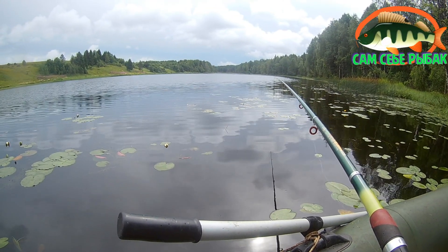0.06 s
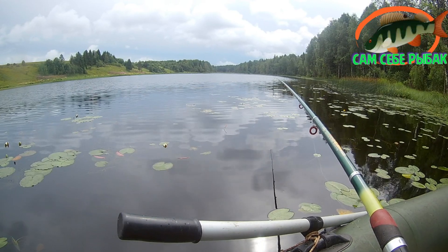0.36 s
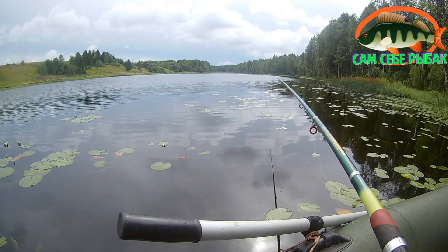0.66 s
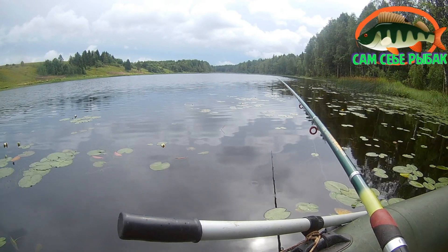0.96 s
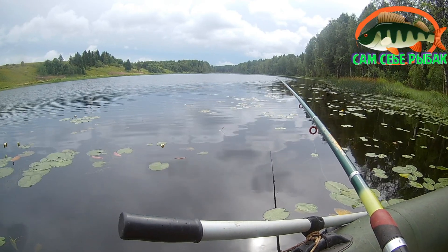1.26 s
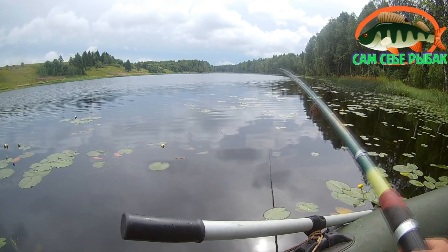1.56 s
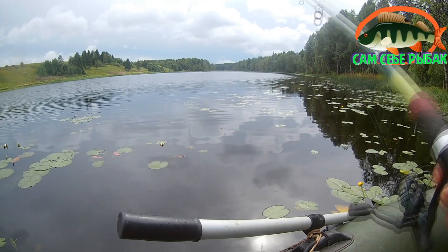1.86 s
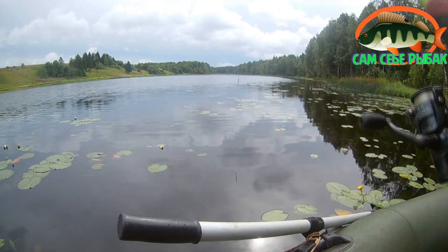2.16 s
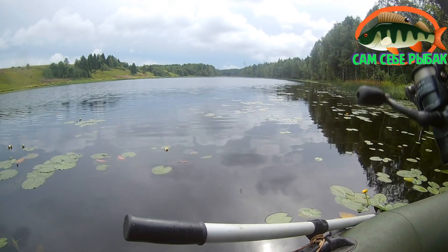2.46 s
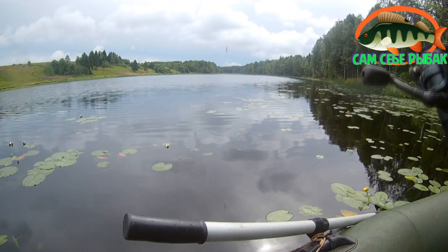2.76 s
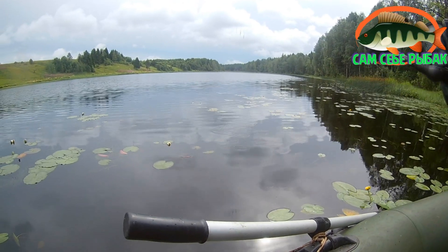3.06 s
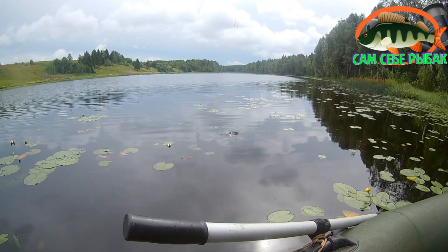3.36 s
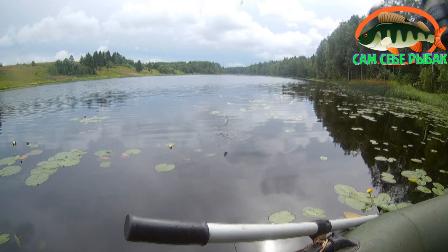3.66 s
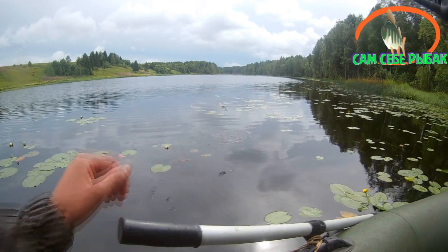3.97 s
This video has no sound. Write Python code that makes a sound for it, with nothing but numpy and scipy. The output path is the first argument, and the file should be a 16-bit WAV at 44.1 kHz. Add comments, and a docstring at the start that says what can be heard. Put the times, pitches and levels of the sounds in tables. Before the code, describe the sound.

A small plop in a river follows a rod's swish and reel clicks, in light wind.

```python
"""Light wind rumbles on the microphone; an insect chirps faintly and an inflatable boat's hull thumps.
A cast follows on the calm river: sleeve and rod rustle, the reel clicks, the rod whistles, line hisses.
The tackle plops in: a slap, ringing bubbles, a falling gurgle, one big cavity and a rising gulp.
A few drops fall back. Water and shore add a faint echo."""
import sys
import numpy as np
from scipy import signal
from scipy.fft import rfft, irfft, next_fast_len
from scipy.io import wavfile
from scipy.ndimage import map_coordinates

SR = 44100
rng = np.random.default_rng(int(sys.argv[2]) if len(sys.argv) > 2 else 0)


def to_wav(sig):
    """Store sig (one row per channel, or 1-D mono) as 16-bit WAV at the path in sys.argv[1].

    Samples outside -1..1 are clipped; the rate is SR.
    """
    pcm = np.clip(np.atleast_2d(sig), -1, 1) * 32767
    pcm = np.round(pcm).astype(np.int16)
    wavfile.write(sys.argv[1], SR, pcm.T)  # frames by channels


N = 4 * SR


def amp(db):
    """dB to gain."""
    return 10 ** (np.asarray(db) / 20)


def unit(x):
    """x at rms 1."""
    return x / np.sqrt(np.mean(x ** 2) + 1e-20)


def clock(n=N):
    """Times of n samples, s."""
    return np.arange(n) / SR


def curve(rows):
    """(time_s, value) rows, interpolated per sample."""
    return np.interp(clock(), *np.transpose(rows))


def wobble(rate_hz):
    """Smooth random curve, rate_hz knots per second."""
    return map_coordinates(rng.standard_normal(int(N * rate_hz / SR) + 4), [clock() * rate_hz])


def filtered(x, response):
    """Zero-phase filter with gain response(hz)."""
    size = next_fast_len(N + SR // 2)
    return irfft(rfft(x, size) * response(np.fft.rfftfreq(size, 1 / SR)), size)[:N]


def noise(spectrum):
    """Noise at rms 1, shaped by (freq_hz, gain_db) rows."""
    freq_hz, gain_db = np.transpose(spectrum)
    white = rng.standard_normal(N)
    return unit(filtered(white, lambda hz: amp(np.interp(np.log(hz + 1), np.log(freq_hz + 1), gain_db))))


def fade(t, t60_s):
    """Exponential decay, -60 dB at t60_s."""
    return np.exp(-np.log(1000) * t / t60_s)


def ramp(t, attack_s):
    """Linear rise to 1."""
    return np.minimum(t / attack_s, 1)


def damped(t, pitch_hz, t60_s):
    """Decaying sine."""
    return fade(t, t60_s) * np.sin(2 * np.pi * pitch_hz * t)


def sweep(pitch_hz):
    """Phase of a changing pitch, rad."""
    return 2 * np.pi * np.cumsum(pitch_hz) / SR


def add(track, start_s, sound):
    """Mix sound into track at start_s."""
    part = track[round(start_s * SR):][:len(sound)]
    part += sound[:len(part)]


def wind():
    """Wind on the microphone: low rumble, plus a brighter flutter in strong gusts."""
    levels = [(0, -44.5), (.04, -48.5), (.07, -39.5), (.12, -46), (.21, -50.5), (.26, -45), (.33, -47),
              (.39, -41.5), (.47, -47.5), (.535, -50), (.62, -53), (.76, -64), (1.36, -69), (1.52, -56.5),
              (1.9, -64.5), (2.15, -58.5), (2.36, -61), (2.53, -50.5), (2.78, -56), (2.96, -56),
              (3.06, -43.5), (3.17, -47), (3.26, -40), (3.33, -48.5), (3.56, -50.5), (3.66, -46.5),
              (3.76, -52), (3.89, -53.5), (4, -55.5)]  # time_s, level_db
    rumble_spectrum = [(10, -22.5), (22, 3.5), (55, 0), (80, 2), (120, -2.5), (190, -13), (300, -23.5),
                       (430, -36.5), (700, -59), (1500, -120)]  # freq_hz, gain_db
    gust_spectrum = [(20, -21), (70, -12.5), (130, 5), (210, -2.5), (320, -15.5), (500, -25), (1000, -45),
                     (2500, -51), (5000, -120)]  # freq_hz, gain_db
    flutter_db = 1.3
    level_db = curve(levels)
    gust_db = -51.5 + 2.02 * (level_db + 46.5)  # grows twice as fast as the rumble
    rumble = amp(level_db - 0.5 + flutter_db * wobble(21.88)) * noise(rumble_spectrum)
    gusts = amp(gust_db + flutter_db * wobble(28)) * noise(gust_spectrum)
    return rumble + gusts


def air():
    """Quiet open air with a faint high whine."""
    spectrum = [(60, -17.5), (150, -3), (270, -4.5), (450, -9.5), (900, -11.5), (1200, -16.5),
                (1600, -20.5), (2100, -21.5), (3000, -26), (5000, -30.5), (8000, -33.5), (11500, -35.5),
                (15500, -34)]  # freq_hz, gain_db
    tones = [(8903, -97), (9505, -99.5)]  # pitch_hz, level_db
    whine = sum(amp(db) * np.sin(2 * np.pi * hz * clock()) for hz, db in tones)
    return amp(-65.5 + 0.3 * wobble(5)) * noise(spectrum) + whine


def insect():
    """Short high rasps from the bank, five or six a second."""
    chirps = [(.065, -82), (.26, -80.5), (.51, -81.5), (.66, -80.5), (.825, -82), (.985, -81.5),
              (1.25, -84), (1.395, -80), (1.515, -82), (1.74, -85), (1.92, -82), (2.07, -82.5), (2.24, -83),
              (2.47, -83), (2.62, -83), (2.785, -81), (2.985, -80), (3.09, -82), (3.26, -80.5), (3.49, -78),
              (3.66, -80.5), (3.835, -80.5)]  # centre_s, level_db
    spectrum = [(5000, -39), (6600, -20), (7200, 0.5), (8000, -36), (8500, 1), (9000, 2.5), (9600, -3),
                (10400, -13), (13000, -28)]  # freq_hz, gain_db
    t, half_width_s = clock(), 0.023
    envelope = sum(amp(db) * np.exp(-((t - centre_s) / half_width_s) ** 4) for centre_s, db in chirps)
    return envelope * noise(spectrum)


def thumps():
    """The soft hull answers each bump with a few slow cycles."""
    bumps = [(0.521, -36, 80), (0.575, -45.5, 88), (0.799, -53, 69), (1.444, -50, 97), (2.411, -48, 64),
             (2.878, -44.5, 57.3), (3.802, -39.5, 51.6)]  # start_s, level_db, pitch_hz
    out, t = np.zeros(N), clock(SR // 6)
    swell_s = 0.0054
    envelope = t / swell_s * np.exp(1 - t / swell_s)
    for start_s, level_db, pitch_hz in bumps:
        add(out, start_s, amp(level_db) * envelope * np.sin(2 * np.pi * pitch_hz * t))
    return out


def rustle():
    """Grainy rubbing of sleeve and rod."""
    levels = [(0, -74.5), (1.45, -77.5), (1.55, -67.5), (1.63, -59), (1.68, -58.5), (1.76, -61),
              (1.86, -67), (2.0, -62), (2.13, -59.5), (2.22, -61), (2.3, -65), (2.55, -65.5), (2.9, -71.5),
              (3.08, -66.5), (3.3, -72.5), (3.65, -60.5), (3.8, -64), (4, -56.5)]  # time_s, level_db
    spectrum = [(100, -8), (230, 0), (560, 0), (740, 4), (930, 5), (1220, -1.5), (1480, -9.5), (1900, -15),
                (2200, -9.5), (2600, -20), (3200, -32.5), (4800, -19.5), (6300, -37.5), (9000, -34.5),
                (15000, -51)]  # freq_hz, gain_db
    grain = amp(1.3 * wobble(140))
    return amp(curve(levels)) * unit(grain * noise(spectrum))


def line_hiss():
    """Line slides through the rod rings."""
    levels = [(0, -105), (1.5, -92), (1.6, -79), (1.66, -75.5), (1.71, -82), (1.77, -74), (1.85, -95),
              (2.05, -75.5), (2.3, -104), (3.4, -86), (3.7, -77), (3.9, -75.5), (4, -71.5)]  # time_s, level_db
    spectrum = [(1500, 1.5), (3300, -2), (4800, 6), (6500, -7.5), (8000, -20), (9300, 1), (12000, -22),
                (15000, -22)]  # freq_hz, gain_db
    return amp(curve(levels)) * noise(spectrum)


def clicks():
    """Rod and reel click: a snap, a dull knock of the grip, a short ring of the rod."""
    hits = [(1.6154, -36.5, 910), (2.099, -42.5, 930), (2.1677, -43.5, 950), (2.204, -42.5, 880),
            (2.808, -51, 664), (3.045, -49, 910), (3.082, -44, 880), (3.841, -48.5, 880)]  # start_s, level_db, pitch_hz
    rod_modes = [(854, 0.5, 0.018), (1150, -13, 0.096), (2130, 3, 0.0076), (4870, -10, 0.013)]  # freq_hz, gain_db, t60_s
    out, t = np.zeros(N), clock(SR // 10)
    knock = amp(-4) * damped(t, pitch_hz=440, t60_s=0.011)
    for start_s, level_db, pitch_hz in hits:
        ring = sum(amp(db + rng.normal(0, 0.69)) * damped(t, hz, t60_s) for hz, db, t60_s in rod_modes)
        snap = damped(t, pitch_hz, t60_s=0.014)
        add(out, start_s, amp(level_db) * ramp(t, attack_s=0.00037) * (snap + knock + amp(-15) * ring))
    return out


def swish():
    """Air sheds off the swinging rod in a brief, breathy, rising whistle."""
    centre_s, half_width_s, centre_hz, rise_hz_per_s = 1.69, 0.024, 960, 1200
    t = clock() - centre_s
    phase = sweep(centre_hz + rise_hz_per_s * t) + 0.9 * wobble(220)
    return amp(-60.5) * np.exp(-(t / half_width_s) ** 2) * unit(np.sin(phase))


def clinks():
    """Small metal parts of reel and tackle touch and ring."""
    hits = [(1.7897, -56, 2460, 0.021), (2.1495, -50, 2220, 0.029), (2.313, -53.5, 2380, 0.013),
            (2.8756, -61, 2900, 0.027), (3.173, -62, 2340, .025)]  # start_s, level_db, pitch_hz, t60_s
    out, t = np.zeros(N), clock(SR // 10)
    for start_s, level_db, pitch_hz, t60_s in hits:
        phase = 2 * np.pi * pitch_hz * t + 0.5 * wobble(580)[:len(t)]
        add(out, start_s, amp(level_db) * ramp(t, attack_s=0.0018) * fade(t, t60_s) * np.sin(phase))
    return out


def splash():
    """Short noise bursts: tackle and drops hitting the surface, and bright overtones of two bubbles."""
    bursts = [(3.4095, -54, 3500), (3.4238, -43, 3650), (3.4342, -59, 5000), (3.4445, -59, 3600),
              (3.4545, -59, 3600), (3.48, -68, 7000), (3.4908, -52.5, 8000), (3.497, -66, 8000),
              (3.510, -59, 8000), (3.528, -55.5, 8000), (3.579, -47.5, 9050), (3.582, -46.5, 8000),
              (3.589, -50, 4000), (3.720, -54.5, 9000), (3.735, -57, 6000), (3.744, -51.5, 9000)]  # start_s, level_db, cutoff_hz
    spectrum = [(200, -29), (600, 0), (1150, 2.5), (1700, -8), (2350, 3), (2850, -8), (3450, -13.5),
                (4000, -21), (4700, -8.5), (6500, -40), (8000, -36), (9000, -15), (11000, -36),
                (15000, -48)]  # freq_hz, gain_db
    out, t = np.zeros(N), clock(SR // 20)
    envelope = ramp(t, attack_s=0.00018) * fade(t, t60_s=0.027)
    for start_s, level_db, cutoff_hz in bursts:
        burst = filtered(noise(spectrum), lambda hz: 1 / np.sqrt(1 + (hz / cutoff_hz) ** 10))
        add(out, start_s, amp(level_db) * envelope * burst[:len(t)])
    return out


def bubbles():
    """Trapped air rings; its pitch rises and its level drops as it nears the surface."""
    pockets = [(3.4125, 2000, -49, 0.0039, .04, 0.13, 0.005),
               (3.4236, 1030, -28.5, 0.00103, 0.0098, .02, 0.0082),
               (3.4339, 1040, -47, 0.00091, 0.018, .02, 0.0062),
               (3.4448, 1080, -32, 0.0016, 0.022, .02, 0.013),
               (3.4477, 890, -41, 0.0014, 0.016, .02, 0.0086), (3.4541, 926, -28, 0.00164, 0.02, .03, .01),
               (3.4583, 920, -39, 0.0013, 0.028, .02, 0.0082),
               (3.474, 845, -36.5, 0.0031, 0.064, 0.022, 0.018),
               (3.4790, 1344, -42, 0.0017, 0.021, .05, 0.013),
               (3.4890, 453, -38.5, 0.0048, 0.22, 0.32, 0.0335),
               (3.52, 1040, -41.5, 0.0007, 0.023, 0.12, 0.016),
               (3.5380, 2330, -46, 0.0023, 0.021, .05, 0.015),
               (3.5515, 2170, -41, 0.00058, 0.015, .02, 0.0086),
               (3.5790, 1103, -28, 0.0039, 0.016, 0.31, 0.0034)]  # start_s, pitch_hz, gain_db, swell_s, t60_s, rise_fraction, rise_s
    out, t = np.zeros(N), clock(SR // 10)
    for start_s, pitch_hz, gain_db, swell_s, t60_s, rise_fraction, rise_s in pockets:
        depth = np.exp(-(t / rise_s) ** 8.3)  # 1 at the start, 0 at the surface
        rising_hz = pitch_hz * (1 + rise_fraction * (1 - depth))
        envelope = ramp(t, swell_s) * fade(np.maximum(t - swell_s, 0), t60_s) * (0.27 + 0.53 * depth)
        churn_rad = 0.2 * wobble(330)[:len(t)]
        add(out, start_s, amp(gain_db) * envelope * np.sin(sweep(rising_hz) + churn_rad))
    return out


def gurgle():
    """The air pocket behind the sinking tackle lengthens, so its rough note falls."""
    glide = [(3.422, 1200, -80), (3.427, 1150, -49), (3.452, 1020, -45), (3.469, 860, -51),
             (3.484, 730, -44), (3.497, 620, -72)]  # time_s, pitch_hz, level_db
    time_s, pitch_hz, level_db = np.transpose(glide)
    out, t = np.zeros(N), np.arange(time_s[0], time_s[-1], 1 / SR)
    width_hz = 330
    churn = (unit(wobble(width_hz)) + 1j * unit(wobble(width_hz))) / np.sqrt(2)
    note = np.exp(1j * sweep(np.interp(t, time_s, pitch_hz)))
    add(out, time_s[0], amp(np.interp(t, time_s, level_db)) * np.real(churn[:len(t)] * note))
    return out


def spray():
    """Tiny droplets land at random, each a high ping."""
    count, start_s, span_s, median_hz, t60_cycles = 30, 3.47, 0.14, 3970, 31
    out, t = np.zeros(N), clock(SR // 20)
    for delay_s, (detune, size) in zip(span_s * rng.random(count), rng.standard_normal((count, 2))):
        pitch_hz = median_hz * np.exp(0.3 * detune)
        ping = ramp(t, attack_s=0.001) * damped(t, pitch_hz, t60_cycles / pitch_hz)
        add(out, start_s + delay_s, amp(-58 + 2.3 * size) * ping)
    return out


def gulp():
    """The closing cavity sweeps quickly upward, then sags as it fades."""
    glide = [(3.556, 720, -50), (3.557, 740, -32), (3.560, 850, -32), (3.563, 1060, -27.5),
             (3.566, 1250, -33.5), (3.5685, 1370, -42), (3.572, 1300, -43), (3.576, 1050, -48),
             (3.58, 1000, -70)]  # time_s, pitch_hz, gain_db
    time_s, pitch_hz, gain_db = np.transpose(glide)
    out, t = np.zeros(N), np.arange(time_s[0], time_s[-1], 1 / SR)
    note = np.sin(sweep(np.interp(t, time_s, pitch_hz)))
    add(out, time_s[0], amp(0.8 + np.interp(t, time_s, gain_db)) * note)
    return out


def echo(x):
    """Faint scatter from water and shore."""
    t = clock(SR // 2)
    tail = rng.standard_normal(len(t)) * fade(t, t60_s=0.24)
    return amp(-19) * signal.fftconvolve(x, tail / np.linalg.norm(tail))[:N]


def scene():
    """Mono mix; only the plop, clicks and clinks echo."""
    plop = bubbles() + gurgle() + gulp() + splash() + spray()
    near = plop + clicks() + clinks()
    mix = near + echo(near) + wind() + thumps() + rustle() + line_hiss() + swish() + insect() + air()
    return mix[None]


def record(dry):
    """Brick-wall low-pass."""
    cutoff_hz = 15720
    return filtered(dry[0], lambda hz: hz < cutoff_hz)[None]


dry = scene()
out = record(dry)
to_wav(out)
```